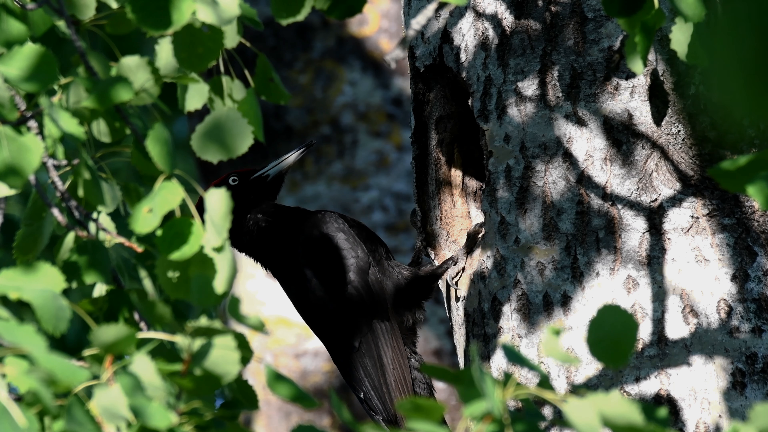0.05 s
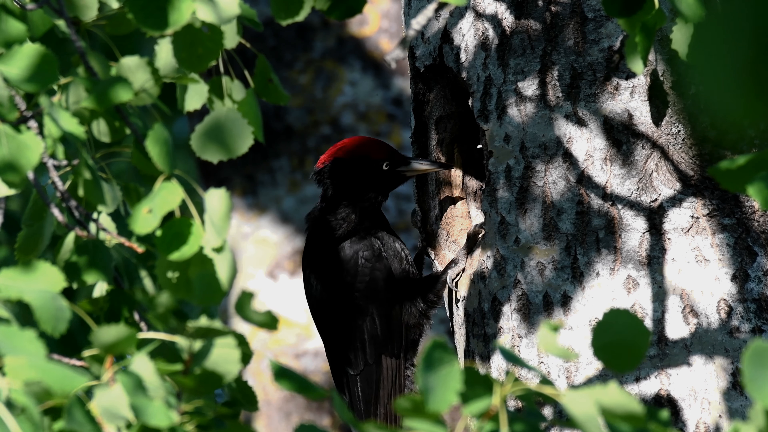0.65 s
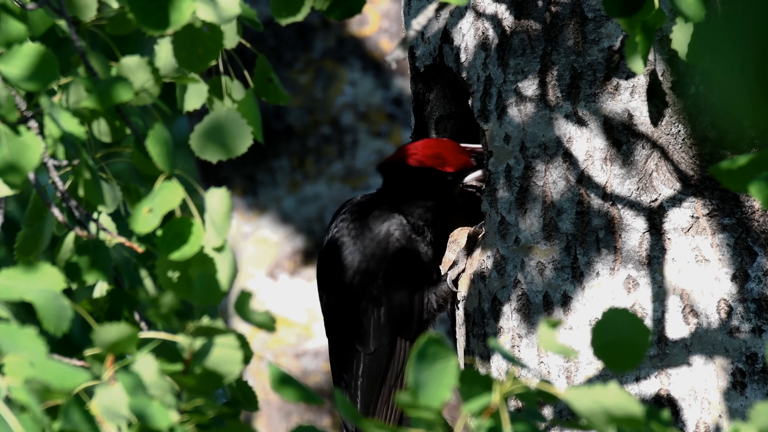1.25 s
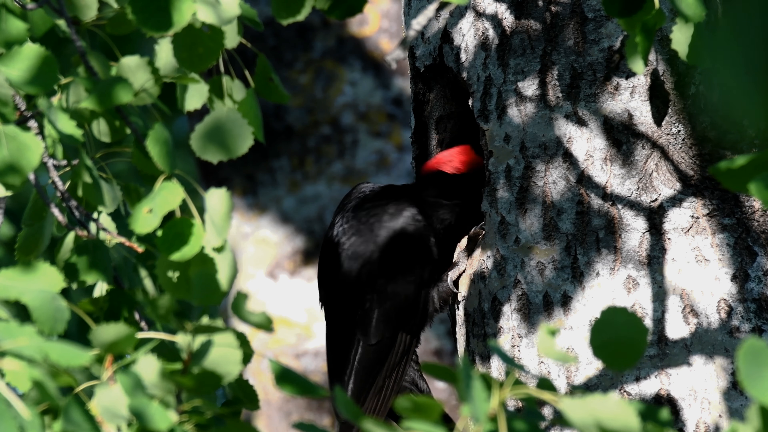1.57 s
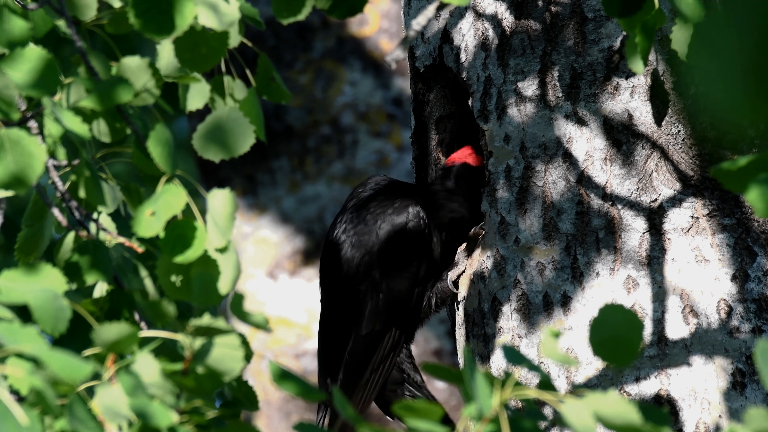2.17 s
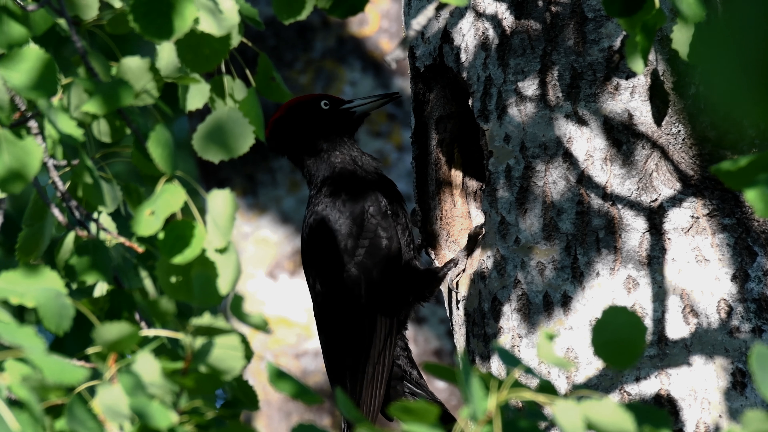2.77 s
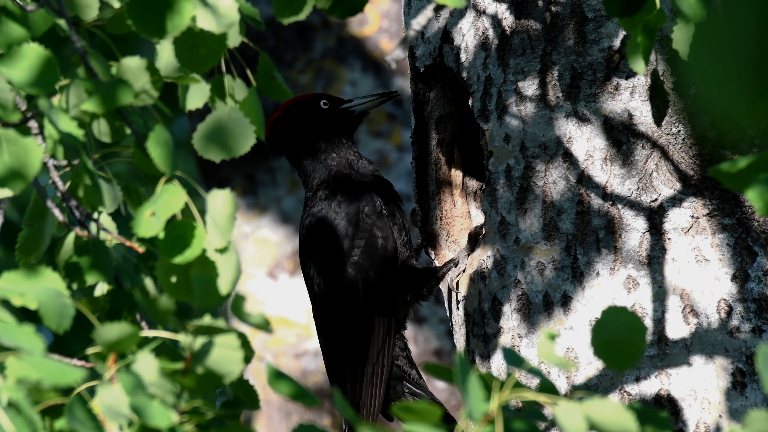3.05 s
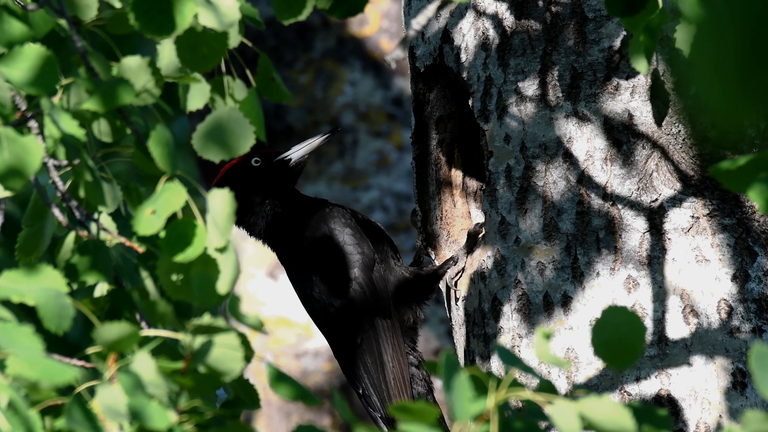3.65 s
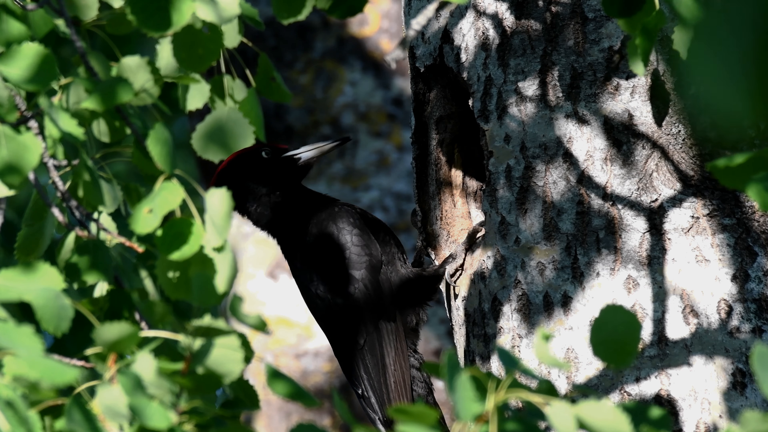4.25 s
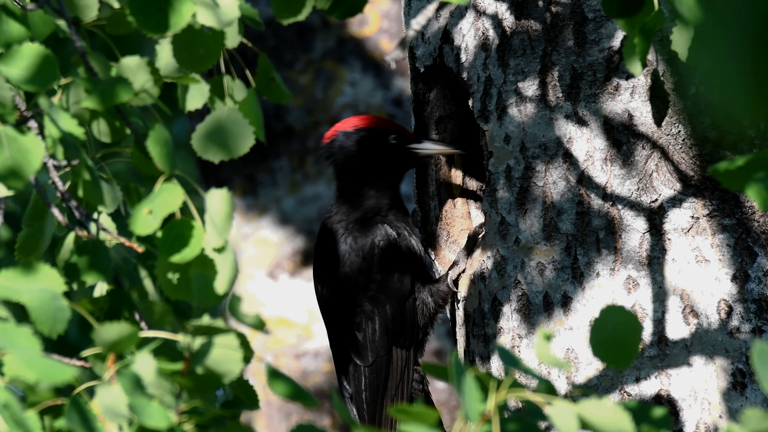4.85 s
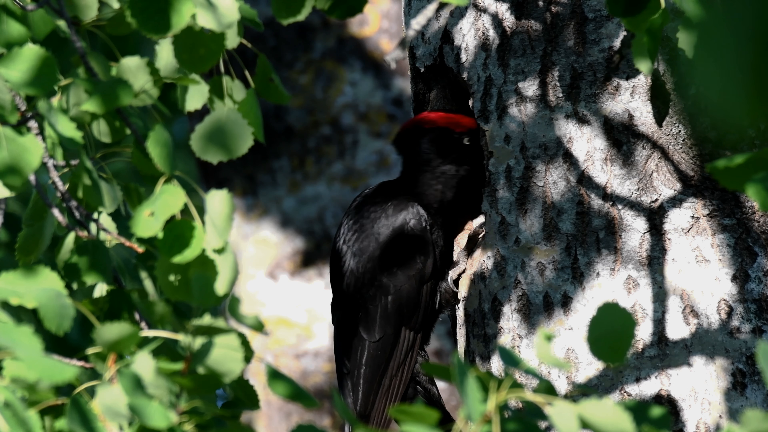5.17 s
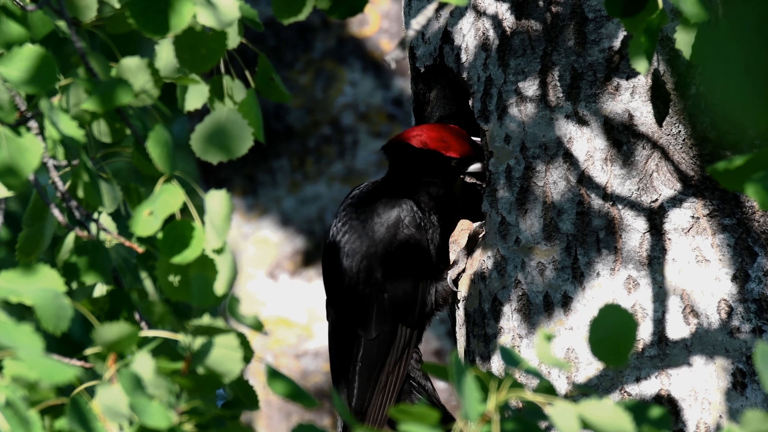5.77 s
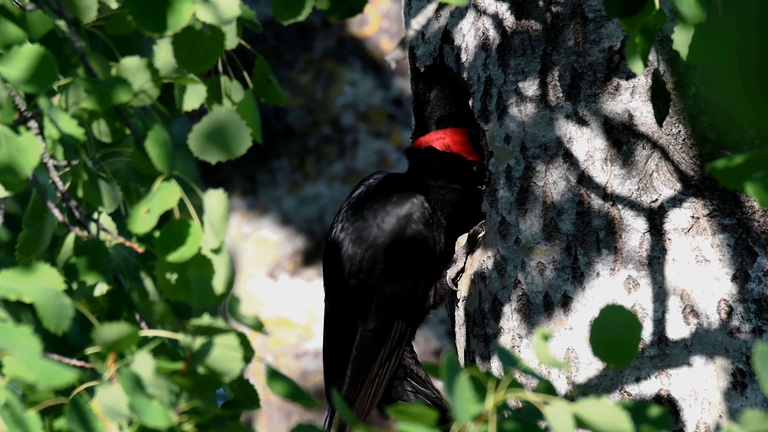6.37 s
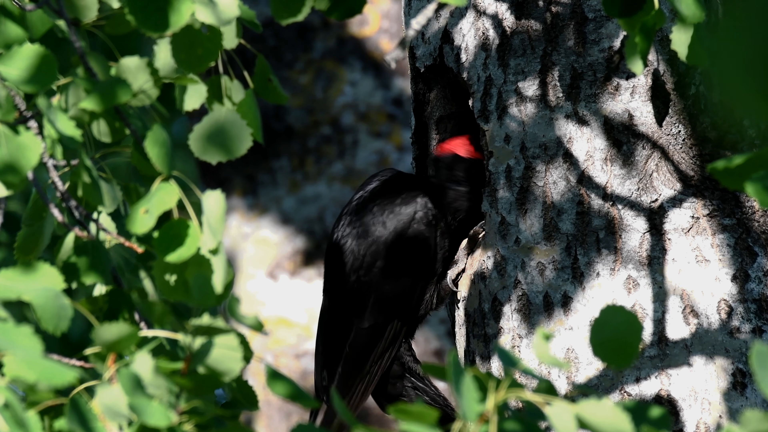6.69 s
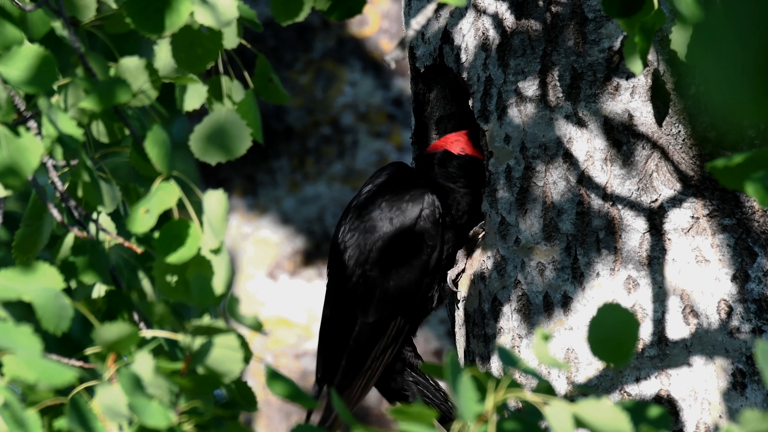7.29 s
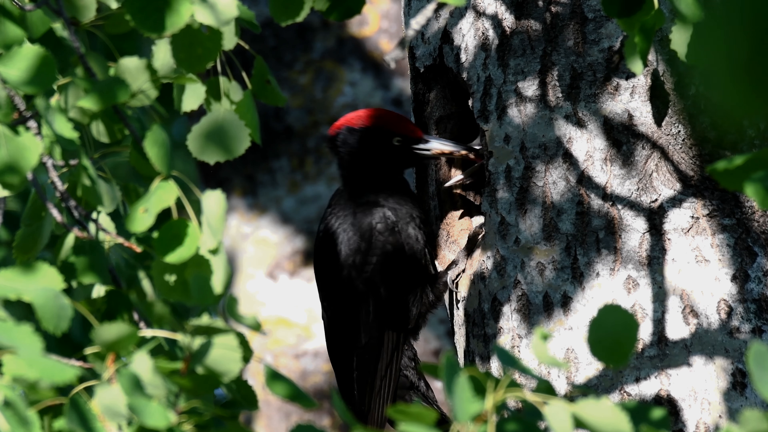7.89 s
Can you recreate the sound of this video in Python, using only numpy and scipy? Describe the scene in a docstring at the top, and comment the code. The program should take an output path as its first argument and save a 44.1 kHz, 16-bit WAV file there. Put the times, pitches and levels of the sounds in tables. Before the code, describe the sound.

Young woodpeckers give short, hoarse, squeaky calls from inside a hollow trunk, fading and swelling again over light wind and distant songbirds.

```python
"""At a tree hole in a forest, woodpecker nestlings beg in four short notes a second while an adult feeds them.
Each note is a swell of hoarse rasp, air forced through the syrinx, that often breaks into a falling yelp;
both ring the wooden cavity. A claw scrapes the bark once and small songbirds whistle further off.
The trees give the calls a soft echo, over a steady rush of leaves and wind."""
import sys
import numpy as np
from scipy import signal
from scipy.fft import rfft, irfft, next_fast_len
from scipy.io import wavfile
from scipy.ndimage import uniform_filter1d

SR = 44100
rng = np.random.default_rng(int(sys.argv[2]) if len(sys.argv) > 2 else 0)


def int16_out(signal):
    """Quantize to a 16-bit WAV file."""
    q = np.round(np.clip(np.atleast_2d(signal).T, -1, 1) * 32767)
    wavfile.write(sys.argv[1], SR, q.astype(np.int16))


N = 349713
TOP_HZ = 15700
TIME = np.arange(N) / SR
FFT_SIZE = next_fast_len(N + SR)
FREQ = np.maximum(np.arange(FFT_SIZE // 2 + 1) * SR / FFT_SIZE, 1)


def begging(base_spread_s=.016, stretch_per_s=.027, stretch_per_db=-.01):
    """The rhythm of the begging: each note's crest and spread in seconds, its rasp and hiss in dB."""
    # Each row: crest in seconds, rasp level in dB.
    notes = [(0.018, -42), (.268, -39.5), (.508, -42), (0.739, -40), (.963, -41), (1.201, -45),
             (1.462, -52), (1.715, -55), (1.979, -57), (2.239, -56.5), (2.499, -56.5), (2.758, -55),
             (3.011, -56), (3.271, -53.5), (3.514, -49.5), (3.77, -54), (4.022, -54.5), (4.273, -53),
             (4.539, -52.5), (4.799, -50), (5.025, -49.5), (5.273, -47.5), (5.501, -43), (5.724, -45.5),
             (5.956, -47.5), (6.193, -47), (6.43, -50), (6.682, -49.5), (6.924, -50), (7.175, -51),
             (7.409, -44), (7.646, -40.5), (7.887, -43)]
    # The hiss dips while the adult's head fills the hole. Each row: time in seconds, dB over the rasp.
    hiss_over_rasp = [(0, -0.5), (.5, 4), (.97, 5.5), (1.2, -2.5), (1.72, 3.5), (3.8, 6.5), (5.03, 3.5),
                      (5.28, 5), (5.5, 0.5), (5.73, -5), (7.15, -4), (7.65, -5), (7.89, -9.5)]
    crest, rasp_db = np.transpose(notes)
    # later and quieter notes last a little longer
    spread = base_spread_s * (1 + stretch_per_s * crest + stretch_per_db * (rasp_db - rasp_db.mean()))
    hiss_db = rasp_db + np.interp(crest, *np.transpose(hiss_over_rasp))
    return list(zip(crest, spread, rasp_db, hiss_db))


def rasps(flutter_db=1.5, lead_s=.05, wheeze_db=-16, squeak_hz=5950, climb_oct_per_s=1.7):
    """Air forced through a syrinx without locking into a tone; a wheeze and a rising squeak lead in."""
    # The three colours of the breath. Each row: frequency in Hz, level in dB.
    rasp_colour = [(700, -36), (1100, -1.5), (1500, -1), (2400, -3.5), (3200, 4.5), (4100, 3.5), (4900, -4),
                   (6000, -5), (9000, -69), (14000, -70)]
    hiss_colour = [(2500, -41), (4600, -7), (5500, 1.5), (6300, 4.5), (7000, -3.5), (8500, -3.5),
                   (11000, -12), (13000, -23.5), (15500, -65)]
    wheeze_colour = [(2500, -24), (3200, -0.5), (4700, -17), (5500, 0), (5900, -19), (6500, -3.5),
                     (7500, -7), (11000, -15.5), (15000, -36)]
    rasp, hiss, wheeze, squeak = np.zeros((4, N))
    waver = 1 + .0134 * wobble(500, N)
    for crest, spread, rasp_db, hiss_db in begging():
        near, t = around(crest, reach_s=.12)
        rasp[near] += undb(rasp_db) * swell(t, spread, .98 * spread, steepness=1.3)
        hiss[near] += undb(hiss_db) * swell(t, spread, .98 * spread, steepness=1.15)
        lead_in = undb(hiss_db + wheeze_db) * swell(t + lead_s, .02, .02, steepness=2.1)
        wheeze[near] += lead_in
        pitch = squeak_hz * 2 ** (climb_oct_per_s * (t + lead_s)) * waver[near]
        squeak[near] += undb(-3) * lead_in * np.sin(phase(pitch))
    flutter = undb(flutter_db * wobble(450, N))
    breath = undb(-1.5) * rasp * scattered(rasp_colour) + hiss * scattered(hiss_colour)
    return flutter * (breath + wheeze * scattered(wheeze_colour) + squeak)


def voicing(pip_hz=1507, pip_fall_oct_per_s=13.9, pip_strain=.35, clear_s=.03):
    """Where the voice sounds: the yelps, and a soft pip at the crest of each note that has none."""
    # Each row: crest in seconds, pitch there in Hz, fall there in octaves per second,
    # relative level in dB, strain from 0 to 1.
    cries = [(.009, 1372, 7.5, -30, 1), (.272, 1399, 5.5, -31.5, 1), (.507, 1376, 4.6, -31.5, 0.92),
             (.743, 1422, 9.97, -33.5, 1), (.96, 1540, 11.8, -38, .6), (0.978, 1433, 4.8, -32, 1),
             (1.197, 1540, 21.2, -41.5, 0.21), (3.254, 1582, 6.4, -48.5, 0.64), (3.738, 1996, 4.1, -49, 1),
             (4.792, 2040, 7.5, -50.5, 0), (5.016, 1850, 6.9, -53.5, 0.1), (5.261, 2070, 7, -47, 0.42),
             (5.498, 2040, 7.2, -42, .5), (6.645, 1740, 8.7, -54.5, 0.6), (7.402, 1790, 18, -40, 0.03),
             (7.419, 1303, 7.1, -45, 0.52), (7.64, 1970, 20, -39.5, 0.6), (7.656, 1343, 17, -41.5, 0.64),
             (7.888, 2260, 10.8, -44.5, .25), (7.899, 2547, 4, -44.5, .3)]
    pips = []
    for crest, _, rasp_db, hiss_db in begging():
        if all(abs(crest - cry[0]) > clear_s for cry in cries):
            pip_db = rasp_db - 4 - .48 * (hiss_db - rasp_db)  # more hiss, less voice
            pips.append((crest, pip_hz, pip_fall_oct_per_s, pip_db, pip_strain))
    return cries + pips


def yelps(climb_oct_per_s=7, peak_lead_s=.01114, bend_s=.00524, opening_db_per_s=700, harmonics=10):
    """The syrinx locks into a tone that climbs, then bends down through the throat's resonances."""
    # The throat's colour. Each row: frequency in Hz, gain in dB.
    throat = [(900, 7), (1400, -7), (2100, -8), (2750, -1), (3400, 1), (4150, -10.5), (5000, -17),
              (5700, -10), (6900, -8), (8500, -14.5), (11000, -25), (14000, -47)]
    out = np.zeros(N)
    order = np.arange(1, harmonics + 1)[:, None]
    waver = 1 + .013 * wobble(700, N)
    voiced = voicing()
    offsets = rng.uniform(0, 2 * np.pi, (len(voiced), harmonics, 1))
    for (crest, hz, fall, db, strain), offset in zip(voiced, offsets):
        # strain makes a yelp longer and brighter
        spread = .0056 + .0068 * strain
        bright_db = -16 + 21 * strain
        near, t = around(crest, reach_s=3 * spread)
        climb_oct = -climb_oct_per_s * np.maximum(-t - peak_lead_s, 0)
        drop_oct = 2 * fall * bend_s * (np.logaddexp(0, t / bend_s) - np.log(2))
        pitch = hz * 2 ** (climb_oct - drop_oct) * waver[near]
        # the overtones open up ahead of the crest; dull notes lose the top first
        opening_db = np.minimum(opening_db_per_s * (t + spread / 2), 0)
        overtones_db = (order > 1) * (opening_db + bright_db * (1 + .75 * np.log2(order / 2)))
        # each harmonic shivers on its own, the high ones most
        shiver_db = np.sqrt(order) * np.array([wobble(350, size=8192)[:len(t)] for _ in order])
        gains = undb(curve(throat, order * pitch) + overtones_db + shiver_db) * (order * pitch < TOP_HZ)
        gains /= np.linalg.norm(gains, axis=0) / np.sqrt(2)
        tone = np.sum(gains * np.sin(order * phase(pitch) + offset), axis=0)
        # it swells gently, holds and breaks off
        envelope = np.exp(-np.where(t < 0, (t / (1.2 * spread)) ** 2, np.abs(t / (1.1 * spread)) ** 3))
        out[near] += tone * undb(db) * envelope
    return out


def hollow(calls):
    """The cavity's air modes ring on top of the sound that leaves the hole directly."""
    # Each row: resonance in Hz, width in Hz, gain in dB.
    modes = [(1274, 140, 0.5), (1539, 74, 5.5), (1796, 70, 8.5), (2082, 71, 7), (2296, 58, 10.5),
             (2490, 100, 8), (2810, 10, 7), (3060, 65, -7), (3220, 98, 1.5), (3795, 130, 6),
             (4172, 38.5, 10), (4150, 120, 6), (5100, 45, 0), (5770, 77, 5.5), (6770, 45, 1)]
    ring = sum((undb(db) - 1) / (1 + 1j * (FREQ / hz - hz / FREQ) * hz / width)
               for hz, width, db in modes)
    return shape(calls, 1 + ring)


def claw(crest_s=3.072, spread_s=.012, db=-53.5):
    """A claw scrapes the bark as the adult shifts its grip on the trunk."""
    # Each row: frequency in Hz, level in dB.
    scrape_colour = [(900, -25), (1600, -5), (2000, -2), (2500, -6), (3500, -16), (7000, -28), (12000, -50)]
    return undb(db) * swell(TIME - crest_s, spread_s, spread_s, steepness=1.7) * scattered(scrape_colour)


def whistle(start, length, hz, glide_oct, arch_oct, db, trill=0, trill_hz=56):
    """A thin whistle that glides and arches in pitch; in a trilled one pitch and level beat quickly."""
    out = np.zeros(N)
    near = slice(int(start * SR), int((start + length) * SR))
    progress = np.linspace(0, 1, len(TIME[near]))
    waver = 1 + .0127 * wobble(243, size=16384)[:len(progress)]
    beat = 2 * np.pi * trill_hz * length * progress
    contour_oct = glide_oct * (progress - .5) - arch_oct * (2 * progress - 1) ** 2
    pitch = hz * 2 ** contour_oct * (1 + trill * np.sin(beat)) * waver
    envelope = np.abs(np.sin(np.pi * progress)) ** .62 * (1 - min(7 * trill, .8) * np.cos(beat))
    out[near] = undb(db) * np.sqrt(2) * envelope * np.sin(phase(pitch))
    return out


def songbirds(slur_s=.029, glide_oct=-.64, arch_oct=.084, shimmer_db=2):
    """Slurs and whistles ahead, trills off to the right; all shimmer through the leaves."""
    # Quick downward slurs. Each row: start in seconds, first pitch in Hz, relative level in dB.
    slur_notes = [(2.634, 6350, -65), (2.895, 6320, -61), (3.124, 4950, -55), (3.337, 4900, -56),
                  (3.443, 5000, -58), (3.544, 5020, -53), (3.655, 5020, -54), (4.378, 4370, -52)]
    # Clear whistles. Each row: start and length in seconds, middle pitch in Hz,
    # glide and arch in octaves, relative level in dB.
    whistle_notes = [(1.127, 0.041, 3570, 0.15, .05, -58), (1.855, 0.048, 2640, 0.15, 0.12, -58),
                     (2.188, 0.033, 2560, -0.061, .03, -62), (2.319, 0.07, 2644, 0, 0.27, -64),
                     (2.344, .089, 1784, -0.053, -0.02, -63), (2.735, 0.082, 2834, -.14, .04, -56.5),
                     (2.847, .035, 4100, .27, 0, -60), (3.349, 0.083, 2580, -0.022, 0.26, -60.5),
                     (4.333, 0.09, 2624, -.09, -0.091, -57), (4.419, 0.035, 3500, 0.53, 0, -56),
                     (5.134, 0.031, 3160, .42, .1, -55.5), (5.636, .06, 3750, -0.36, -0.051, -56)]
    # Buzzy trills. Each row: start and length in seconds, pitch in Hz, relative level in dB.
    trill_notes = [(.087, 0.15, 2980, -57), (1.326, 0.11, 4240, -63), (2.523, 0.12, 4270, -62),
                   (4.56, .11, 3430, -61.5), (4.61, .13, 3070, -56.5), (4.83, .061, 4020, -61),
                   (4.933, 0.096, 3030, -52.5), (5.763, .125, 2925, -58)]
    to_middle = 2 ** (glide_oct / 2 + arch_oct)
    slurs = sum(whistle(s, slur_s, hz * to_middle, glide_oct, arch_oct, db) for s, hz, db in slur_notes)
    whistles = sum(whistle(*note) for note in whistle_notes)
    trills = sum(whistle(s, length, hz, 0, 0, db, trill=.047) for s, length, hz, db in trill_notes)
    shimmer = undb(shimmer_db * wobble(150, N))
    return shimmer * (slurs + whistles + trills * undb([[-5], [5]]))


def air(level_db=-55, apart_hz=800):
    """A far, even rush of leaves and wind: alike on both sides in the bass, unrelated in the treble."""
    # Each row: frequency in Hz, level in dB.
    rush_colour = [(20, -20), (40, -14.5), (70, -3.5), (120, -4.5), (220, 0.5), (520, -1), (780, 3.5),
                   (1200, -3.5), (2000, -10), (4200, -11), (6300, -14), (8500, -19.5), (11000, -23),
                   (15500, -28)]
    # Each row: frequency in Hz, left minus right in dB at full width.
    balance = [(750, -2.5), (1400, -3.5), (3500, 0), (6200, -1), (10500, 1.5), (14000, 0.5)]
    mid, side = noise(rush_colour, channels=2)
    width = 1 / np.sqrt(1 + (apart_hz / FREQ) ** 6)
    rush = mid + np.outer([1, -1], shape(side, width))
    rush = shape(rush, pan(balance) ** width / np.sqrt(1 + width ** 2))
    return unit(rush) * undb(level_db - .93 * wobble(1.393, N))


def reflections(t60, build_s):
    """Frequency response of scattered echoes that build up and die away, unrelated left and right."""
    t = TIME[:SR]
    envelope = undb(-60 * t / t60) * (1 - np.exp(-t / build_s))
    return rfft(rng.standard_normal((2, SR)) * envelope / np.linalg.norm(envelope), FFT_SIZE)


def scattered(colour, apart_db=-4):
    """Stereo noise: one part shared, one part scattered to each side alone."""
    shared, *own = noise(colour, channels=3)
    return unit(shared + undb(apart_db) * np.array(own))


def noise(colour, channels):
    """Independent noises of one colour, rms 1."""
    return unit(shape(rng.standard_normal((channels, N)), undb(curve(colour, FREQ))))


def wobble(rate_hz, size):
    """Smooth random motion with a spread near 1."""
    at = np.arange(size) * rate_hz / SR
    return 1.36 * np.interp(at, np.arange(size), rng.standard_normal(size))


def swell(t, rise_s, fall_s, steepness):
    """A rounded crest at t = 0 with its own rise and fall."""
    u = np.where(t < 0, t / rise_s, t / fall_s)
    return np.exp(1 - (1 + u * u) ** (steepness / 2))


def around(crest_s, reach_s):
    """The samples near a crest, and their time from it in seconds."""
    near = slice(max(int((crest_s - reach_s) * SR), 0), int((crest_s + reach_s) * SR))
    return near, TIME[near] - crest_s


def phase(pitch):
    """Running phase of a moving pitch."""
    return 2 * np.pi * np.cumsum(pitch) / SR


def pan(balance):
    """Left and right gains for every frequency."""
    return undb(np.outer([1, -1], curve(balance, FREQ)) / 2)


def curve(points, hz):
    """Read (Hz, dB) points on a log-frequency axis."""
    points_hz, db = np.transpose(points)
    return np.interp(np.log(hz), np.log(points_hz), db)


def shape(x, response):
    """Filter by a frequency response."""
    return irfft(rfft(x, FFT_SIZE) * response, FFT_SIZE)[..., :N]


def power(x):
    """Short-time power."""
    return np.abs(uniform_filter1d(x ** 2, size=400)) + 1e-12


def unit(x):
    """Scale to rms 1."""
    return x / np.sqrt(np.mean(x ** 2))


def undb(db):
    """Decibels to gain."""
    return 10 ** (np.asarray(db) / 20)


def scene(right_lag_s=1.5e-5):
    """The nest close by and the songbirds further off, scattered by bark, echoed by the trees."""
    # The nest's place in the stereo image. Each row: frequency in Hz, left minus right in dB.
    nest_balance = [(1200, -2), (3000, -3), (4300, 0.5), (5800, -4.5), (7200, -1.5), (8500, 0.5),
                    (10500, 8), (14000, 1)]
    forest = reflections(t60=.6, build_s=.015)
    bark = reflections(t60=.05, build_s=.0015)
    voice = undb(-1.5) * yelps()
    rasp = rasps()
    # while the syrinx is locked into a tone, the rasp thins out
    locked = power(voice) / (power(voice) + power(rasp[0]))
    rasp *= 1 - .62 * locked
    close = 1 + undb(-5.5) * bark + undb(-12) * forest
    distant = undb([[-5], [-3]]) + undb(-8) * bark + undb(-6) * forest
    placement = pan(nest_balance) * np.exp(-2j * np.pi * np.outer([0, right_lag_s], FREQ))
    nest = shape(hollow(voice + rasp), placement * close)
    return nest + shape(songbirds(), distant) + claw() + air()


def record(dry):
    """Two steep notches in the treble, then the top is cut."""
    # The recorder's dead bands. Each row: centre in Hz, width of one filter pass in Hz.
    notches = [(7690, 830), (9610, 770)]
    for hz, width in notches:
        b, a = signal.iirnotch(hz, hz / width, fs=SR)
        dry = signal.lfilter(b, a, signal.lfilter(b, a, dry))
    return signal.sosfilt(signal.ellip(10, .2, 70, TOP_HZ, fs=SR, output="sos"), dry)


dry = scene()
out = record(dry)
int16_out(out)
```